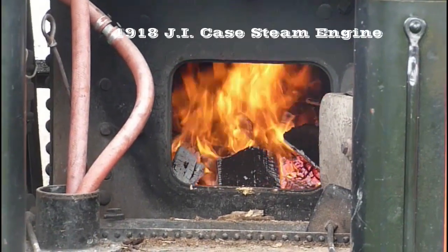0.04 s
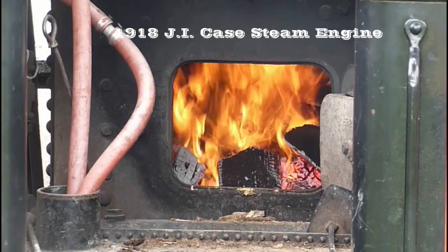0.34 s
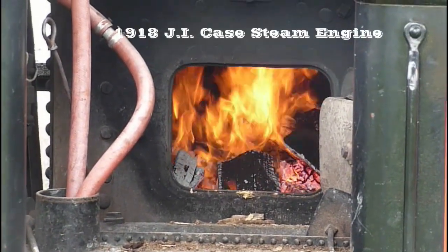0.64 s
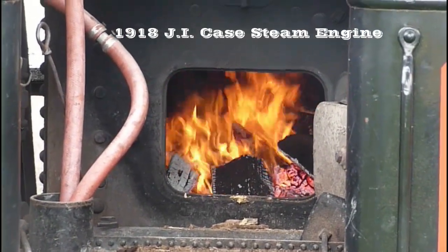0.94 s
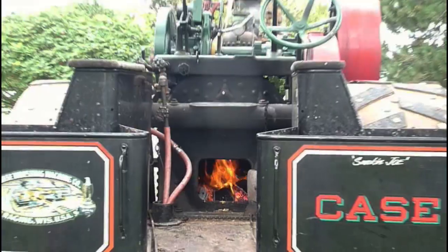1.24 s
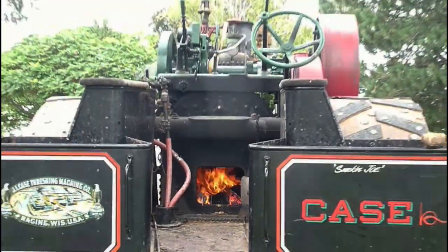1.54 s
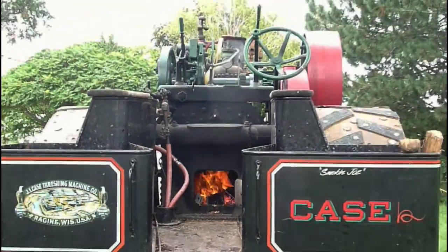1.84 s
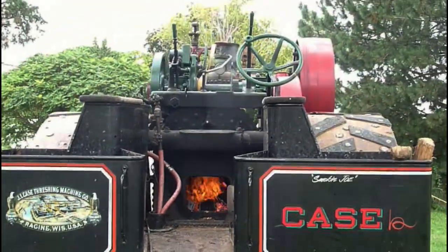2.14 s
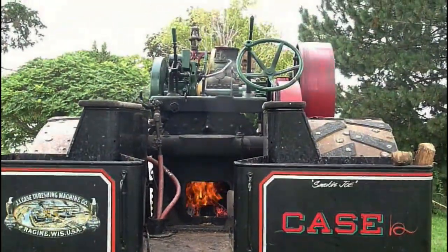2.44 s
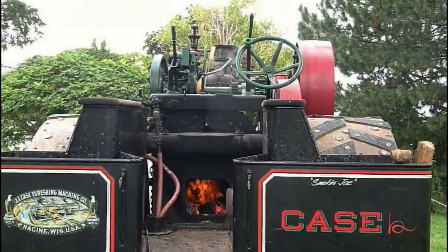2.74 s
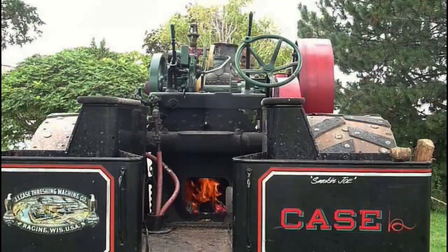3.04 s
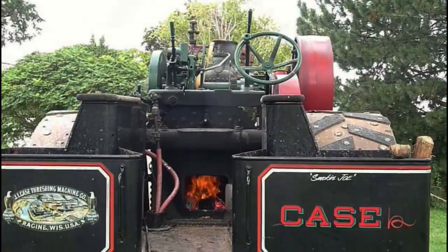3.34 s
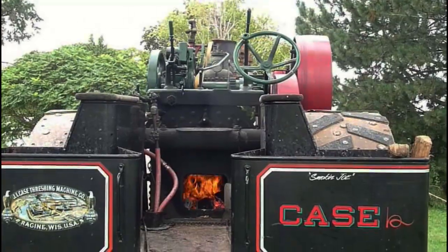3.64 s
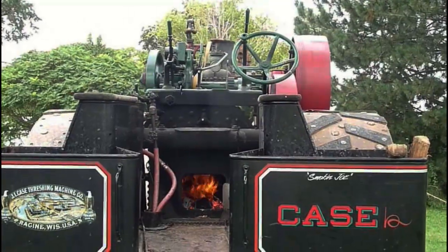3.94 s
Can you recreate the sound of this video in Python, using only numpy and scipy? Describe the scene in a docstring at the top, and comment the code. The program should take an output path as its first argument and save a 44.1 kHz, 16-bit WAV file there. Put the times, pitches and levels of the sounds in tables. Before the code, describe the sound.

A wood fire burns straight ahead in an open iron firebox outdoors, rumbling low and hissing faintly while logs snap and embers tick. A sharp pop and a hollower one follow, and the rumble and hiss sink.

```python
"""Wood fire in a steam engine's firebox

The engine stands outdoors, firebox open. Burning gas rumbles, the draught rushes, steam and sap hiss.
Embers tick, logs snap and a few gas pockets pop; each crack rattles briefly between the iron walls.
Towards the end the rumble and hiss sink away."""
import sys
import numpy as np
from scipy import signal
from scipy.fft import rfft, irfft
from scipy.io import wavfile
from scipy.ndimage import uniform_filter1d

SR = 44100
rng = np.random.default_rng(int(sys.argv[2]) if len(sys.argv) > 2 else 0)


def to_wav(s):
    """Save 16-bit WAV."""
    ch = np.atleast_2d(s).T  # columns
    pcm = np.round(np.clip(ch, -1, 1) * 32767)  # PCM
    wavfile.write(sys.argv[1], SR, pcm.astype(np.int16))


N = 176400


def flames(rumble_trim_db=3.5, rush_trim_db=4.5):
    """Low rumble of burning gas plus the softer rush of the draught."""
    # Spectra. Each row: frequency in Hz, relative density in dB.
    rumble_spectrum = [(11, -36), (20, -8), (30, 2.5), (44, -3), (70, 0), (95, -6.5), (125, -9), (160, -19),
                       (260, -36.5), (600, -94)]
    rush_spectrum = [(70, -12), (170, 4), (240, 2), (400, -6), (650, -15), (1000, -21.5), (2000, -29.5),
                     (4000, -38.5), (9000, -62)]
    rumble = flow(rumble_spectrum, flicker_db=0.2, flicker_hz=10)
    rush = flow(rush_spectrum, flicker_db=2.03, flicker_hz=32.4)
    return amp(level_db("rumble") + rumble_trim_db) * rumble + amp(level_db("rush") + rush_trim_db) * rush


def snaps():
    """Dry snaps of splitting wood; rows at one moment are the resonances of one log."""
    # Each row: start in seconds, strength in dB, centre in Hz, width in octaves, nominal length in ms.
    fractures = [(0.016,-17,11960,0.74,.7), (0.0935,-11.5,11000,2,0.12), (0.1295,-12.5,7880,1.4,0.44),
                 (0.1551,-14.5,4000,1.8,1.1), (0.364,-10,4800,1.9,0.67), (0.4256,-5.5,1140,0.45,0.33),
                 (0.4261,-0.5,3200,0.59,.3), (0.4258,5,5850,0.34,0.33), (0.4262,4,9600,0.17,0.15),
                 (0.4254,-10,14000,.7,0.25), (0.4553,-9.5,1400,0.77,0.41), (0.5359,-10.5,5800,1.25,0.18),
                 (0.5993,-3.5,4840,0.82,0.26), (0.5993,-2,11500,0.78,0.34), (0.6406,-14.5,6850,1.4,.2),
                 (0.6898,-12,4000,1.03,1.4), (0.8306,-4,9800,0.4,0.93), (0.9705,-3,1600,0.42,0.15),
                 (0.9707,-5.5,4430,.5,0.26), (0.9711,-6,11500,0.85,0.35), (1.092,-5.5,2030,0.85,0.25),
                 (1.144,-15,5270,1.6,1.1), (1.2495,-14,2400,4.3,1.1), (1.2496,-5,4320,.15,0.61),
                 (1.2504,-4.5,9800,0.72,1.3), (1.264,-15,4770,1.5,1.1), (1.4346,-14.5,10100,0.5,0.28),
                 (1.4647,-14,8100,3.6,0.68), (1.6327,-11,8600,2.5,0.46), (1.7144,-5,940,0.66,0.28),
                 (1.7144,-3.5,2540,0.56,0.7), (1.7147,-0.5,7600,1.02,1.06), (1.8128,-18,3580,.12,0.63),
                 (1.8744,-16.5,1480,5,2.7), (2.0079,-14.5,6000,4.8,1.5), (2.0085,-6,7900,.25,0.46),
                 (2.038,-11.5,10900,0.89,0.27), (2.069,-5.5,1550,0.72,0.48), (2.069,-7,5300,0.53,0.62),
                 (2.0900,-9,6060,1.35,0.3), (2.0940,-6.5,5530,0.58,0.73), (2.2406,-11.5,4500,6.1,0.59),
                 (2.255,-17,3420,5.9,0.72), (2.2907,-11.5,5200,8.1,0.61), (2.2903,-3.5,4600,0.19,.44),
                 (2.5649,-1,4770,1.1,0.48), (2.5856,-18,4000,1.6,1.5), (2.5943,-12,7240,1,0.43),
                 (2.7257,-11.5,5700,0.81,0.38), (2.7992,-6.5,1650,1.7,0.29), (2.8002,-4.5,11400,0.68,0.35),
                 (2.8636,-12,1900,2.5,0.44), (2.9417,-6,1100,1.9,0.7), (2.9401,-2.5,5100,0.8,0.46),
                 (2.9824,-4.5,3460,0.41,0.44), (2.9825,-9.5,6500,1.7,0.53), (3.1869,-14.5,2890,2.1,4.1),
                 (3.2907,-22.5,4040,2.5,0.35), (3.3672,-23,4240,0.76,0.31), (3.448,-19.5,5600,1.05,2.2),
                 (3.5457,-20,3000,2.1,0.43), (3.7627,-20.5,5640,3.1,1.8), (3.79,-22.5,7340,0.77,0.59),
                 (3.8276,-17.5,6130,2.3,1.2), (3.927,-21,2890,3.3,0.57), (3.981,-19,7240,0.86,0.69),
                 (3.9908,-21.5,4390,3.1,0.33)]
    out = np.zeros((2, N))
    for start_s, db, hz, octaves, length_ms in fractures:
        add(out, start_s, crack(hump(db, hz, octaves), length_ms))
    return out


def pops(dull_db=-8.5):
    """Gas pockets burst: a hard crack, the knock of the log, the hollow thump of freed gas."""
    # Each row: start in seconds, crack strength in dB, centre in Hz, width in octaves, nominal length
    # in ms, thump in dB and Hz, knock in dB and Hz, treble shelf corner in Hz.
    pockets = [(2.5723, 16, 4900, 1.09, 0.69, 9.5, 460, 10, 1210, 8900),
               (3.251, 5, 3900, 0.8, 0.33, 12, 533, 9.5, 1650, 5530),
               (3.28, -24, 4500, 2.0, 0.73, 8.5, 335, -11, 1400, 8000)]
    out = np.zeros((2, N))
    for start_s, db, hz, octaves, length_ms, thump_db, thump_hz, knock_db, knock_hz, dull_hz in pockets:
        knock = hump(knock_db, knock_hz, octaves=0.57)
        thump = hump(thump_db, thump_hz, octaves=1.09)
        colour = np.linalg.norm([hump(db, hz, octaves), knock, thump], axis=0) * shelf(dull_hz, dull_db)
        add(out, start_s, crack(colour, length_ms, splinter_db=1, side_db=-14.5, smooth_bins=35))
    return out


def crack(colour, length_ms, splinter_db=6.5, side_db=-14, smooth_bins=61, lag_cycles=0.533):
    """One fracture: sharp pulse, splintering, wall echoes; colour sets the broad spectrum."""
    burst = amp(splinter_db) * scatter(1.42 * length_ms, side_db)
    burst[:, 0] += 1
    burst = burst + firebox_echoes() * np.linalg.norm(burst[0])
    size = len(colour)
    power = (abs(np.fft.fft(burst, size)) ** 2).mean(0)
    gain = colour / np.sqrt(uniform_filter1d(power, smooth_bins, mode="wrap"))
    log_gain = np.conj(signal.hilbert(np.log(gain + gain.max() * 1e-4)))  # minimum phase
    hz = np.fft.fftfreq(size, 1 / SR)
    lag_rad = 2 * np.pi * lag_cycles * np.sign(hz) * np.log(1 + abs(hz) / 150)  # lows trail highs
    pulse = np.fft.ifft(np.exp(log_gain - 1j * lag_rad)).real[:size // 2]
    return signal.fftconvolve(burst, pulse[None], axes=1)


def firebox_echoes():
    """Early echoes off the iron walls plus a fainter tail."""
    early = amp(-19.5) * scatter(decay_ms=5, side_db=-1.0)
    tail = amp(-24.5) * scatter(decay_ms=12.6, side_db=-1.5)
    return early + tail


def hiss(high_trim_db=-3, dip_s=0.898, dip_half_s=0.031):
    """Escaping steam and sap in two bands; the high band dips once, briefly."""
    # Spectra. Each row: frequency in Hz, relative density in dB.
    low_spectrum = [(900, -29.5), (2200, -4.5), (3300, -2), (4300, -4.5), (4900, 3.5), (5400, 5.5),
                    (6200, 0), (7200, -5), (10000, -32)]
    high_spectrum = [(4500, -34), (6700, -15), (7300, 1.5), (7800, -1.5), (8700, 1.5), (9200, 3.5),
                     (10600, 5.5), (11200, 0.5), (12050, -2), (12850, 1), (13500, -8), (14400, 3),
                     (15650, -8), (16000, -32)]
    low = flow(low_spectrum, flicker_db=1.24, flicker_hz=40)
    high = flow(high_spectrum, flicker_db=1.27, flicker_hz=25)
    dip_db = -9.5 * np.exp(-((np.arange(N) / SR - dip_s) / dip_half_s) ** 2)
    return amp(level_db("low hiss")) * low + amp(level_db("high hiss") + high_trim_db + dip_db) * high


def jets(noise, depth_db=1.7, width_hz=600, life_s=0.13, size=512):
    """Many small jets make up a hiss, so its narrow bands swell and fade independently."""
    frames = signal.stft(noise, nperseg=size)[2]
    patches = rng.standard_normal(frames.shape[1:])
    patches = uniform_filter1d(patches, round(width_hz * size / SR), axis=0)
    patches = uniform_filter1d(patches, round(life_s * SR * 2 / size), axis=1)
    return signal.istft(frames * amp(depth_db * unit(patches)), nperseg=size)[1][:, :N]


def ticking(ticks_per_s=68, spots=24, spread_db=2.45, tilt_db_per_octave=1.3):
    """Embers tick at random, each spot with its own colour; the level follows the high hiss."""
    out = np.zeros((2, N))
    for hz in np.geomspace(3000, 13000, spots):
        fires = rng.random(N) < ticks_per_s / spots / SR
        train = fires * amp(spread_db * np.minimum(rng.exponential(1, N), 3.5))
        colour = hump(-25.5 + tilt_db_per_octave * np.log2(hz / 6000), hz, octaves=0.57)
        out += signal.oaconvolve(train[None], crack(colour, length_ms=0.57), axes=1)[:, :N]
    heat_db = level_db("high hiss")
    return out * amp(heat_db - np.median(heat_db))


def hum_and_sizzle():
    """A faint low hum and a thin sizzle of sap: narrow noise bands that swell and fade."""
    # Each row: middle in seconds, half length in seconds, centre in Hz, width in Hz, level in dB.
    bands = [(3.18, 0.2, 177, 8.5, -47), (2.3, 0.22, 13400, 220, -69)]
    t, out = np.arange(N) / SR, np.zeros(N)
    for middle_s, half_s, hz, width_hz, db in bands:
        waver = wander(width_hz / 2) + 1j * wander(width_hz / 2)
        swell = amp(db) * np.exp(-((t - middle_s) / half_s) ** 2)
        out += swell * (waver * np.exp(2j * np.pi * hz * t)).real
    return out


def flow(spectrum, flicker_db, flicker_hz):
    """Turbulent gas: flickering coloured noise, unit rms."""
    # Stereo width: bass and the hiss peaks near 5 and 10 kHz are central, other frequencies wider.
    # Each row: frequency in Hz, side minus mid in dB.
    width_db = [(60, -23), (200, -18), (400, -15.5), (700, -9), (1300, -5), (2600, -4.5), (4000, -10),
                (5200, -22), (6600, -7), (8400, -7), (9800, -26), (11500, -9.5), (15000, -15)]
    hz = np.fft.rfftfreq(N, 1 / SR)
    mid, side = rfft(rng.standard_normal((2, N)))
    side = side * amp(read(width_db, hz))
    noise = irfft(np.array([mid + side, mid - side]) * amp(read(spectrum, hz)), N)
    return unit(noise * amp(flicker_db * wander(flicker_hz)))


def level_db(part):
    """Level curve of one steady part of the fire, per sample, before trim."""
    # Each row: time in seconds, then rumble, rush, low hiss and high hiss in dB.
    levels = [(0.0, -34.5, -49, -59.5, -53.5), (0.38, -34, -48, -59, -53), (0.69, -35, -51.5, -59.5, -53),
              (1.0, -32.5, -48.5, -59.5, -50), (1.12, -31.5, -48, -56, -54.5),
              (1.37, -33.5, -48.5, -60.5, -49.5), (1.55, -33, -46, -60, -52),
              (1.88, -32.5, -47.5, -59, -51), (2.34, -33.5, -46.5, -57.5, -51),
              (3.12, -36, -50, -59.5, -55.5), (3.26, -37, -53, -61, -59), (3.46, -40, -58, -66, -63),
              (3.69, -43, -57.5, -67.5, -60.5), (4.0, -42, -56, -67, -63)]
    times_s, *curves_db = np.transpose(levels)
    column = ["rumble", "rush", "low hiss", "high hiss"].index(part)
    return np.interp(np.arange(N) / SR, times_s, curves_db[column])


def scatter(decay_ms, side_db, size=3072):
    """Decaying stereo spray of tiny pulses, unit energy."""
    age = np.arange(size) / SR * 1000 / decay_ms
    mid, side = rng.standard_normal((2, size)) * np.exp(-age) * (1 - np.exp(-6 * age))
    side = side * amp(side_db)
    return unit(np.array([mid + side, mid - side])) / np.sqrt(size)


def hump(db, centre_hz, octaves, size=2048):
    """Fracture spectrum: one hump, at least 0.2 octaves wide, no bass."""
    hz = abs(np.fft.fftfreq(size, 1 / SR)) + 1
    offset = np.log2(hz / centre_hz) / max(octaves, 0.2)
    return amp(db) / (1 + offset ** 2) ** 1.5 / np.sqrt(1 + (280 / hz) ** 6)


def shelf(corner_hz, db, size=2048):
    """Steep spectral step of db above the corner."""
    hz = abs(np.fft.fftfreq(size, 1 / SR)) + 1
    return amp(db / (1 + (corner_hz / hz) ** 16))


def wander(cutoff_hz):
    """Low-passed noise, unit rms."""
    hz = np.fft.rfftfreq(N, 1 / SR)
    return unit(irfft(rfft(rng.standard_normal(N)) / (1 + (hz / cutoff_hz) ** 4), N))


def amp(db):
    """Decibels to gain."""
    return 10 ** (np.asarray(db) / 20)


def unit(x):
    """Scale to unit rms."""
    return x / np.sqrt(np.mean(x ** 2) + 1e-20)


def read(points, hz):
    """Interpolate a table over log frequency."""
    points_hz, values = np.transpose(points)
    return np.interp(np.log(hz + 1), np.log(points_hz + 1), values)


def add(mix, start_s, sound):
    """Mix in a stereo sound at start_s."""
    part = mix[:, round(start_s * SR):][:, :sound.shape[1]]
    part += sound[:, :part.shape[1]]


def scene():
    """The whole fire, straight ahead."""
    return flames() + jets(hiss()) + ticking() + snaps() + pops() + hum_and_sizzle()


def record(dry, cutoff_hz=16300):
    """The left microphone hears a little more bass; then a low-pass."""
    # Each row: frequency in Hz, left minus right in dB.
    balance_db = [(30, 1), (150, 1.5), (1000, 1.1), (3000, 0.5), (12000, 0)]
    tilt_db = read(balance_db, np.fft.rfftfreq(N, 1 / SR)) / 2
    heard = irfft(rfft(dry) * amp([tilt_db, -tilt_db]), N)
    lowpass = signal.firwin(255, cutoff_hz, window=("kaiser", 9), fs=SR)
    return signal.oaconvolve(heard, lowpass[None], "same")


dry = scene()
out = record(dry)
to_wav(out)
```